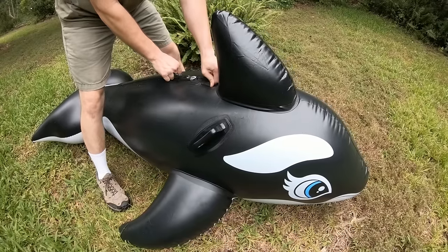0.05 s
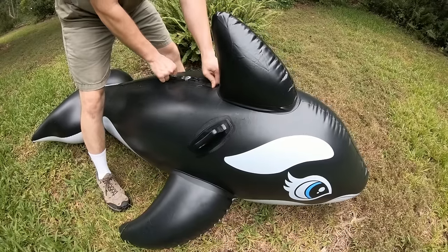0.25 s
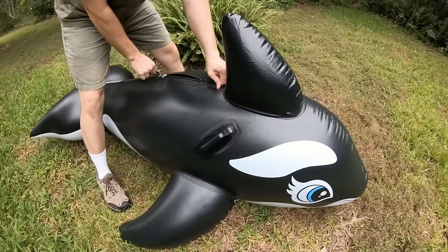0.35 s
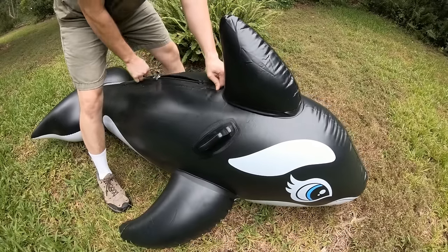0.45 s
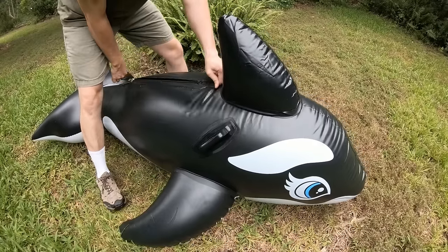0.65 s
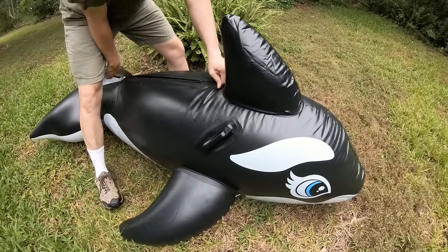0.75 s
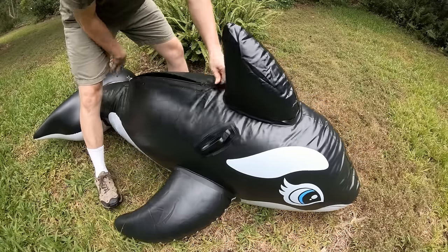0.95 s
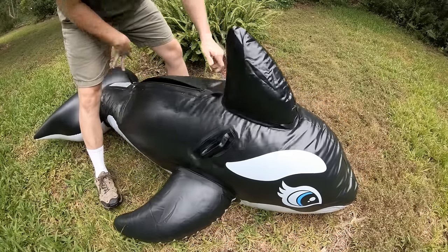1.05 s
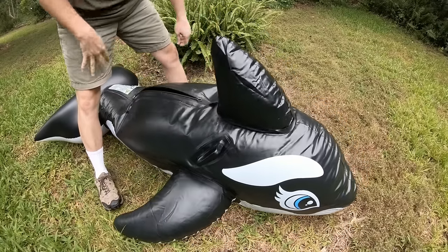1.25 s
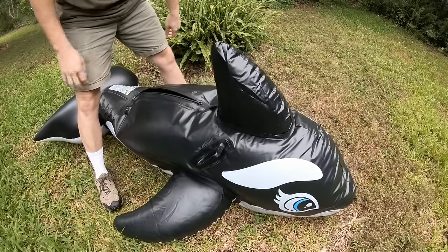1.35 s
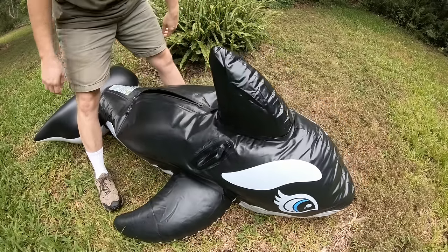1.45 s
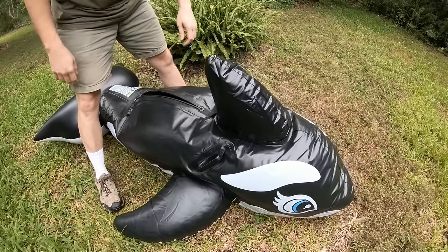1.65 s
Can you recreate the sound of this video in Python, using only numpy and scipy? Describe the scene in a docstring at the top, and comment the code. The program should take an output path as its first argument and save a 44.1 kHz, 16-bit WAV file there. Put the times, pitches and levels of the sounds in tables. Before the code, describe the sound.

Air rushes from a large inflatable toy as its zipper buzzes open, starting at about 0.2 seconds after faint finger rubbing. From 0.45 seconds a high whistle slides downward through the hiss. At 0.7 seconds the zipper stops with a thump. The last air sighs out until about 1.4 seconds while the sagging vinyl crinkles and snaps softly. Quiet garden air and low gusts on the microphone lie underneath.

```python
"""On a lawn, a zipper is pulled open along a large inflatable vinyl toy.
The teeth buzz, higher when the pull is faster, while air hisses and whistles out of the growing slit.
The slider hits its stop with a thump; the last air sighs out and the slack vinyl snaps and crinkles.
Underneath are soft garden air, low gusts on the microphone and fingers rubbing the vinyl."""
import sys
import numpy as np
from scipy import signal
from scipy.fft import rfft, irfft
from scipy.io import wavfile

SR = 44100
rng = np.random.default_rng(int(sys.argv[2]) if len(sys.argv) > 2 else 0)


def materialize(psi):
    """Save the field psi as 16-bit PCM at rate SR to the path in sys.argv[1].

    A 1-D psi becomes a single channel; in a 2-D psi each row is a channel.
    """
    bounded = np.clip(np.atleast_2d(psi).T, -1, 1)
    quanta = np.round(bounded * 32767).astype(np.int16)
    wavfile.write(sys.argv[1], SR, quanta)


N = 74970
T = np.arange(N) / SR

# the falling whistle of the slit: time_s, pitch_hz, clear_tone_db, breathy_tone_db
SLIT_WHISTLE = [(.44, 11300, -48, -60), (.467, 10370, -38.5, -51), (.495, 9720, -40, -43),
                (.522, 8900, -29.5, -38), (.55, 7870, -27, -41), (.575, 7000, -31.5, -30),
                (.60, 6250, -27, -26), (.63, 5660, -29, -36), (0.651, 5165, -45, -30),
                (.71, 4750, -62, -45)]
# the tone colour of rattling, crinkling vinyl: frequency_hz, level_db
VINYL_COLOUR = [(100, -2.5), (350, 9), (1300, -7), (2200, -17), (4300, -37), (9000, -29), (16000, -45)]


def amp(db):
    """Turns decibels into a number to multiply a sound by."""
    return 10 ** (np.asarray(db) / 20)


def unit(x):
    """Scales a signal to an average strength (rms) of 1."""
    return x / np.sqrt(np.mean(x ** 2) + 1e-20)


def add(mix, start_s, sound):
    """Adds a sound to the mix at a given time."""
    part = mix[max(round(start_s * SR), 0):][:len(sound)]
    part += sound[:len(part)]


def colour(x, points):
    """Turns lows and highs up or down along (frequency_hz, level_db) points."""
    hz, db = np.transpose(points)
    bins_hz = np.fft.rfftfreq(len(x), 1 / SR)
    gain = amp(np.interp(np.log(bins_hz + 1), np.log(hz + 1), db))
    return irfft(rfft(x) * gain, len(x))


def noise(points):
    """Noise of strength 1 with a given tone colour."""
    return unit(colour(rng.standard_normal(N), points))


def wander(hz):
    """Random drift of strength 1, wobbling up to about hz times a second."""
    bins_hz = np.fft.rfftfreq(N, 1 / SR)
    return unit(irfft(rfft(rng.standard_normal(N)) * np.exp(-(bins_hz / hz) ** 2), N))


def gate(start_s, end_s, fade_s=0.0063):
    """On between two times, with a short fade on either side."""
    return np.clip(np.minimum(T - start_s, end_s - T) / fade_s + 1, 0, 1)


def level(time_s, db):
    """Loudness that follows a list of points and fades to silence outside them."""
    return amp(np.interp(T, time_s, db)) * gate(time_s[0], time_s[-1])


def phase(hz):
    """The angle a wave has turned through as it follows a pitch curve."""
    return 2 * np.pi * np.cumsum(hz) / SR


def noise_band(hz, width_hz):
    """Noise gathered around a steady or moving pitch."""
    angle = phase(hz * np.ones(N))
    return unit(wander(width_hz) * np.cos(angle) + wander(width_hz) * np.sin(angle))


def zipper(jitter=0.0134, shimmer_db=3):
    """The slider runs over the teeth and shakes the vinyl; returns the buzz and the teeth's phase."""
    # the pull, one wave per tooth: time_s, pitch_hz, base_tone_db, octave_db
    pull = [(.23, 470.7, -36, -32), (.243, 528.1, -12.5, -22.5), (.256, 691.4, -26.5, -21.5),
            (.27, 831, -13.5, -30), (.293, 753.3, -20, -28.5), (.308, 577.7, -22, -29.5),
            (.33, 311.4, -23, -40), (.347, 225.7, -22.5, -34), (.366, 274.3, -22, -38),
            (.395, 319.1, -27, -40), (.437, 305.9, -19.5, -25.5), (.453, 214.8, -26, -24),
            (.479, 250.2, -25.5, -37), (.49, 350.3, -19, -35), (.505, 353.9, -41, -27),
            (.518, 406.9, -22, -30), (.556, 379.1, -18.5, -33.5), (0.566, 343.2, -29.5, -22.5),
            (.615, 352, -26, -21.5), (.657, 337, -26.5, -19), (.68, 426.6, -18.5, -31),
            (.695, 474.4, -15, -62), (.718, 518.4, -23, -20)]
    # higher tones of the teeth: pitch_multiple, level_db
    overtones = [(3, -36), (4, -39), (5, -41.5)]
    ring_hz, ring_width_hz, ring_db = 1430, 140, 2.5
    time_s, hz, base_db, octave_db = np.transpose(pull)
    pitch = np.interp(T, time_s, hz)
    tooth_phase = phase(pitch * (1 + jitter * wander(hz=137)))
    tones = [(1, level(time_s, base_db)), (2, level(time_s, octave_db))]
    tones += [(round(multiple), amp(db) * gate(time_s[0], time_s[-1])) for multiple, db in overtones]
    buzz = np.zeros(N)
    for multiple, gain in tones:
        # the tight vinyl boosts any tone that slides past its own ringing pitch
        boost_db = ring_db * np.exp(-((multiple * pitch - ring_hz) / ring_width_hz) ** 2)
        loudness = gain * amp(boost_db + shimmer_db * wander(hz=61.5))
        buzz += loudness * np.sin(multiple * tooth_phase + 2 * np.pi * rng.random())
    return np.sqrt(2) * buzz, tooth_phase


def air_jet(tooth_phase, chop_depth=0.2, flutter_db=0.06):
    """Swirling air rushes out of the slit, chopped a little by each parting tooth."""
    # loudness of the five parts of the rush: time_s, bass_db, low_mids_db, roar_db, hiss_db, fizz_db
    jet_levels = [(.185, -67, -78, -53, -55, -57), (.213, -55, -58, -45, -34, -30.5),
                  (0.238, -24.5, -27.5, -19.5, -22.5, -29.5), (.28, -20.5, -27.5, -26.5, -18, -30.5),
                  (0.323, -34, -24.5, -22, -23.5, -32), (.40, -24.5, -30.5, -30.5, -27.5, -44.5),
                  (.50, -32.5, -28, -22, -28.5, -36), (.535, -28, -31.5, -26, -25.5, -38),
                  (.60, -22.5, -37.5, -28, -29.5, -45), (.66, -38, -38, -30, -32, -43),
                  (.718, -21, -35, -26, -32, -40.5), (0.726, -55, -22.5, -19, -38.5, -73),
                  (.76, -51, -33, -84, -47, -77)]
    # the tone colour of each part: frequency_hz, level_db
    bass_colour = [(20, 5.5), (50, -8.5), (95, 2), (150, -28), (400, -36)]
    low_mids_colour = [(70, -21), (140, -5), (270, -7), (450, -15), (1000, -71)]
    roar_colour = [(200, -19.5), (400, 1.5), (650, -0.5), (1000, -5.5), (1500, -4), (2200, -21),
                   (5000, -44)]
    hiss_colour = [(400, -17), (1550, 0.5), (1950, 0.5), (2430, 3.5), (2750, 1), (3200, 0), (4000, 2),
                   (4800, 2), (6500, -6.5), (8500, 0), (10000, -14.5), (16000, -55)]
    fizz_colour = [(3000, -23), (8500, -2.5), (11000, -4), (13500, 0.5), (16000, -12)]
    time_s, bass_db, low_mids_db, roar_db, hiss_db, fizz_db = np.transpose(jet_levels)
    chop = (1 + chop_depth * np.cos(tooth_phase)) * amp(flutter_db * wander(hz=202))
    bass = level(time_s, bass_db) * noise(bass_colour)
    low_mids = level(time_s, low_mids_db) * noise(low_mids_colour)
    roar = level(time_s, roar_db) * noise(roar_colour)
    hiss = level(time_s, hiss_db) * noise(hiss_colour)
    fizz = level(time_s, fizz_db) * noise(fizz_colour)
    return chop * (bass + low_mids + roar + slit_echo(hiss) + fizz)


def slit_echo(hiss, strength=0.46, fade_in_s=(0.45, 0.5)):
    """Once the slit is long, the hiss bounces along it and takes on a sliding colour."""
    time_s, hz, _, _ = np.transpose(SLIT_WHISTLE)
    round_trip_s = 3 / np.interp(T, time_s, hz)  # three waves of the whistle fit in one round trip
    echo = np.interp(T - round_trip_s, T, hiss)
    gain = np.interp(T, fade_in_s, [0, strength])
    return (hiss + gain * echo) / np.sqrt(1 + gain ** 2)


def whistle(flutter_db=3.0, waver=0.0077):
    """The slit whistles lower as it lengthens and the pressure falls, then frays into hiss."""
    # brief breathy tones above and below the whistle: start_s, end_s, pitch_ratio, level_db, width_hz
    side_tones = [(0.54, .58, 1.305, -36, 230), (0.454, 0.503, .685, -30.5, 710),
                  (.529, .545, .665, -33, 210)]
    time_s, hz, clear_db, breathy_db = np.transpose(SLIT_WHISTLE)
    pitch = np.interp(T, time_s, hz)
    wavering_pitch = pitch * (1 + waver * wander(hz=390))
    clear = unit(np.sin(phase(wavering_pitch)) * amp(flutter_db * wander(hz=153)))
    breathy = noise_band(pitch, width_hz=500)
    out = level(time_s, clear_db) * clear + level(time_s, breathy_db) * breathy
    for start_s, end_s, ratio, db, width_hz in side_tones:
        out += gate(start_s, end_s) * amp(db) * noise_band(pitch * ratio, width_hz)
    return out


def vinyl_jerk(first_hz, last_hz, glide_s, rise_s, decay_s):
    """A jerk spreads through the vinyl, high notes arriving first."""
    pitch = last_hz + (first_hz - last_hz) / (1 + T / glide_s)
    rise = 1 - np.exp(-T / rise_s)
    fall = (1 + T / decay_s) * np.exp(-2 * T / decay_s)
    return -np.sin(phase(pitch)) * rise * fall


def stop_thump(rise_s=0.0008):
    """The slider hits its stop and jerks the vinyl."""
    # the two jerks of the thump: start_s, level_db, first_pitch_hz, last_pitch_hz, glide_s, decay_s
    jerks = [(0.7202, 7, 781, 454, 0.00039, 0.0025), (0.7238, 2, 223, 12, 0.003, 0.0086)]
    out = np.zeros(N)
    for start_s, db, first_hz, last_hz, glide_s, decay_s in jerks:
        add(out, start_s, amp(db) * vinyl_jerk(first_hz, last_hz, glide_s, rise_s, decay_s))
    return out


def vinyl_snaps(rise_cycles=0.43, rattle_db=-9, rattle_s=0.0077, crack_db=-8.5, tick_s=0.00075):
    """The vinyl buckles in sudden snaps, each with a sharp tick and a short rattle."""
    # the snaps: start_s, level_db, first_pitch_hz, last_pitch_hz, glide_s, decay_s, tick_db, tick_hz
    snaps = [(0.0931, -17, 930, 450, 0.00052, 0.0051, -35, 1410),
             (0.2272, -4.5, 930, 357, 0.00048, 0.0036, -27, 2480),
             (0.934, -16.5, 2760, 68.5, 0.00018, 0.0036, -26.5, 8640),
             (0.9349, -18.5, 218, 109, 0.0013, 0.0093, -53, 2500),
             (1.009, -37, 3000, 300, 0.00036, .002, -31, 8600),
             (1.0462, -24.5, 405, 215, .0005, 0.0026, -53, 1200),
             (1.071, -24.5, 2970, 1290, 0.00013, 0.0047, -27, 8600),
             (1.0732, -25, 620, 310, 0.00046, 0.0033, -38.5, 3970),
             (1.1375, -17, 4600, 250, 0.0004, 0.004, -21.5, 4500),
             (1.1411, -16.8, 3900, 330, 0.00045, 0.0042, -22, 3700),
             (1.1513, -21, 400, 120, 0.0005, 0.004, -31, 2470),
             (1.2108, -36, 1400, 400, 0.00038, 0.004, -36, 8700),
             (1.244, -17, 1000, 185, 0.0006, 0.0064, -29, 4000)]
    out = np.zeros(N)
    for start_s, db, first_hz, last_hz, glide_s, decay_s, tick_db, tick_hz in snaps:
        body = vinyl_jerk(first_hz, last_hz, glide_s, rise_cycles / first_hz, decay_s)
        rattle = amp(rattle_db) * noise(VINYL_COLOUR) * np.exp(-T / rattle_s)
        ping = noise_band(tick_hz, width_hz=470)
        crack = amp(crack_db) * noise_band(tick_hz, width_hz=tick_hz)
        tick = (ping + crack) * np.exp(-T / tick_s)
        add(out, start_s, amp(db) * (body + rattle) + amp(tick_db) * tick)
    return out


def squeaks():
    """The slider catches on the zipper's tape and vinyl rubs on itself, making short sliding tones."""
    # the squeaks: start_s, end_s, first_pitch_hz, last_pitch_hz, level_db
    rubs = [(0.23, 0.304, 610, 581, -24), (0.328, 0.344, 1213, 1050, -28.5), (0.451, 0.493, 870, 1114, -23),
            (1.23, 1.237, 9000, 8700, -44)]
    out = np.zeros(N)
    for start_s, end_s, first_hz, last_hz, db in rubs:
        progress = np.clip((T - start_s) / (end_s - start_s), 0, 1)
        swell = np.sqrt(2 * abs(np.sin(np.pi * progress)))
        pitch = first_hz + (last_hz - first_hz) * progress
        out += amp(db) * swell * np.sin(phase(pitch))
    return out


def crease():
    """After a loud snap, a fold runs on through the vinyl with a dying crackle."""
    # the running fold: start_s, level_db, pitch_hz, width_hz, decay_s
    fold = (1.144, -35, 2700, 1000, .021)
    start_s, db, hz, width_hz, decay_s = fold
    fade = gate(start_s, T[-1]) * np.exp(-np.maximum(T - start_s, 0) / decay_s)
    crackle = unit(noise_band(hz, width_hz) * wander(width_hz))
    return amp(db) * fade * crackle


def sigh(flutter_db=0.95, crinkles_per_s=140, crinkle_db=-9, spread_db=-1.5):
    """The last air flows out softly while the sagging vinyl crinkles."""
    # loudness of the last air: time_s, level_db
    sigh_levels = [(.70, -51), (.745, -32.5), (.78, -38), (.83, -32.5), (0.889, -37), (.97, -35.5),
                   (1.05, -44), (1.13, -40), (1.22, -45.5), (1.32, -47.5), (1.45, -68), (1.7, -49)]
    # its tone colour: frequency_hz, level_db
    sigh_colour = [(30, 1.5), (90, 4), (200, -5.5), (400, -2), (1100, -6), (2000, -10.5), (3000, -14),
                   (5000, -19), (8800, -23.5), (10500, -28.5), (16000, -35)]
    clicks = (rng.random(N) < crinkles_per_s / SR) * rng.choice([-1, 1], N)
    click_sizes = amp(spread_db * np.minimum(rng.exponential(1, N), 3))
    crinkles = amp(crinkle_db) * unit(colour(clicks * click_sizes, VINYL_COLOUR))
    air = noise(sigh_colour) * amp(flutter_db * wander(hz=40))
    return level(*np.transpose(sigh_levels)) * (air + crinkles)


def background(garden_db=-42):
    """Garden air murmurs, gusts push on the microphone and fingers rub the vinyl as they take hold."""
    # loudness of the gusts and of the fingers: time_s, level_db
    gust_levels = [(0, -33), (.2, -26), (.35, -21), (.45, -36), (.85, -26), (1.2, -34), (1.7, -48)]
    finger_levels = [(0, -46), (.1, -43.5), (0.199, -44)]
    # tone colours of the garden, the gusts and the fingers: frequency_hz, level_db
    garden_colour = [(18, -47), (30, -8), (48, -8), (81, -1), (215, -7), (258, -4), (484, -14.5),
                     (699, -13.5), (1460, -20), (2160, -24.5), (15900, -35)]
    gust_colour = [(0, -12), (3, 4.5), (10, 8), (25, -57), (60, -12), (200, -81), (1000, -88)]
    finger_colour = [(40, -14), (170, 5), (420, 8), (800, -7), (2000, -11), (9000, -43), (16000, -36)]
    garden = amp(garden_db) * noise(garden_colour)
    gusts = level(*np.transpose(gust_levels)) * noise(gust_colour)
    fingers = level(*np.transpose(finger_levels)) * noise(finger_colour)
    return garden + gusts + fingers


def scene(scatter_s=0.0028):
    """Everything is straight ahead; faint scattered sound adds a trace of stereo width."""
    # how loud the sides are next to the middle: frequency_hz, level_db
    side_colour = [(50, -43), (500, -49), (1400, -63), (3000, -52), (10000, -21.5)]
    buzz, tooth_phase = zipper()
    middle = buzz + squeaks() + air_jet(tooth_phase) + whistle()
    middle = middle + stop_thump() + vinyl_snaps() + crease() + sigh() + background()
    echoes = rng.standard_normal(N) * T * np.exp(-T / scatter_s)
    scattered = signal.fftconvolve(middle, echoes / np.linalg.norm(echoes))[:N]
    side = colour(scattered, side_colour)
    return np.array([middle + side, middle - side])


def record(dry, ceiling=0.93, cutoff_hz=15950):
    """Rounds off the loudest peaks, then removes the very highest treble."""
    rounded = dry / (1 + (dry / ceiling) ** 8) ** (1 / 8)
    treble_cut = signal.firwin(511, cutoff_hz, window=("kaiser", 9), fs=SR)
    return signal.oaconvolve(rounded, treble_cut[None], "same")


dry = scene()
out = record(dry)
materialize(out)
```